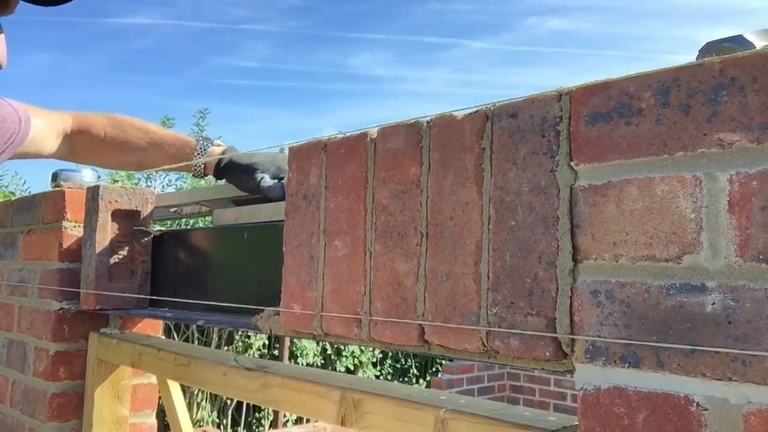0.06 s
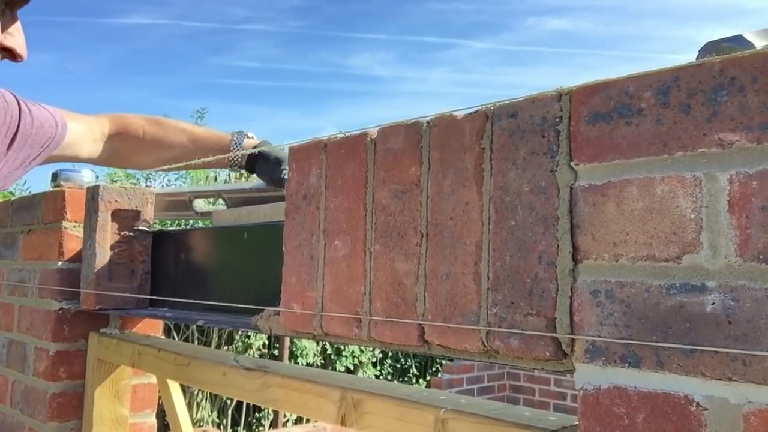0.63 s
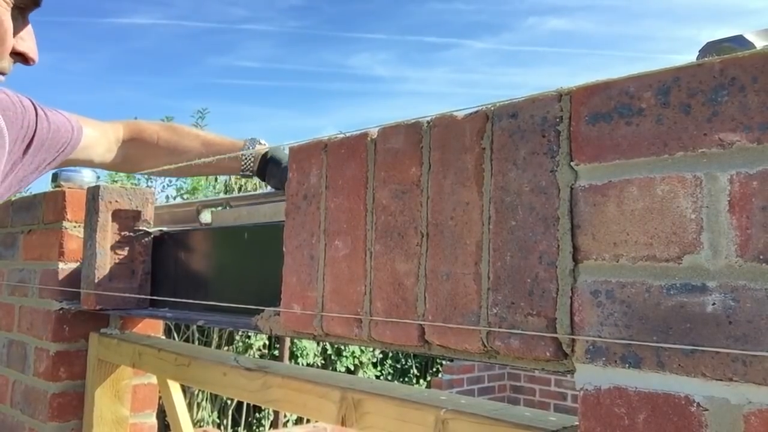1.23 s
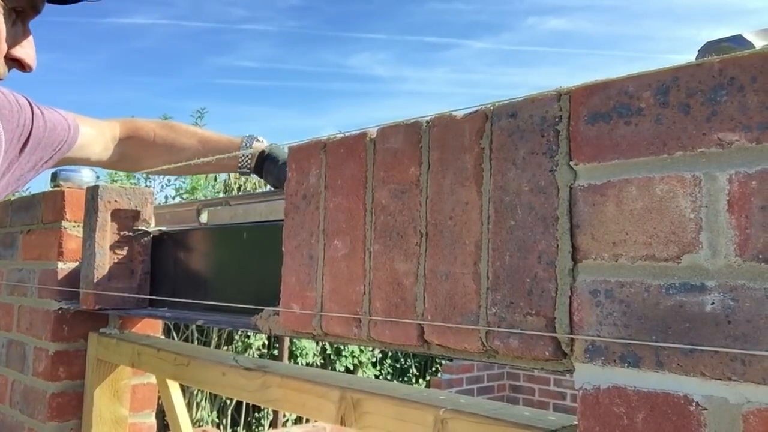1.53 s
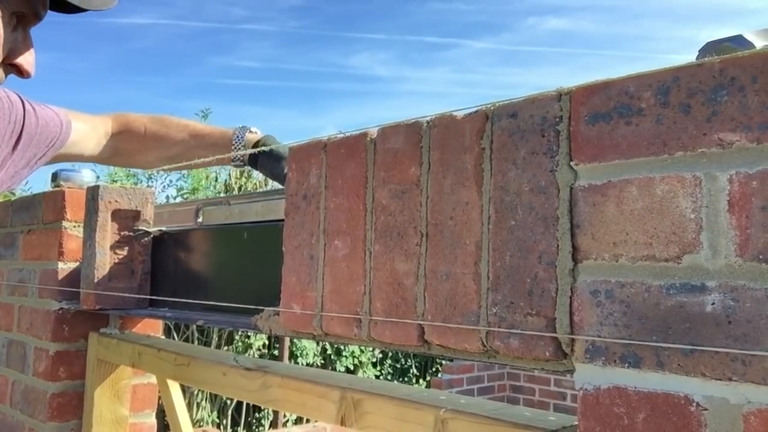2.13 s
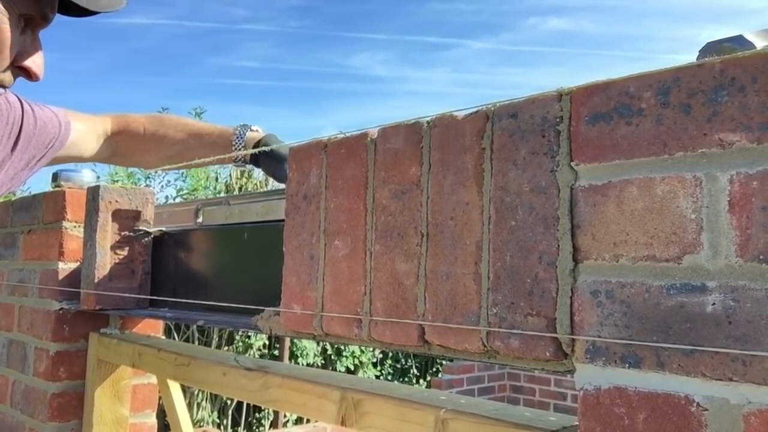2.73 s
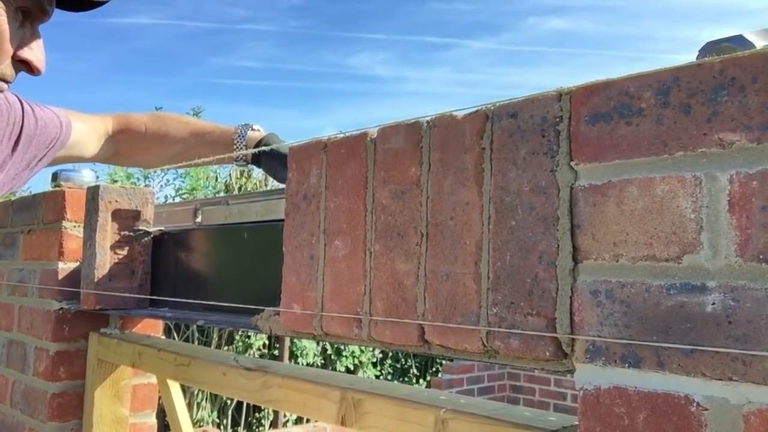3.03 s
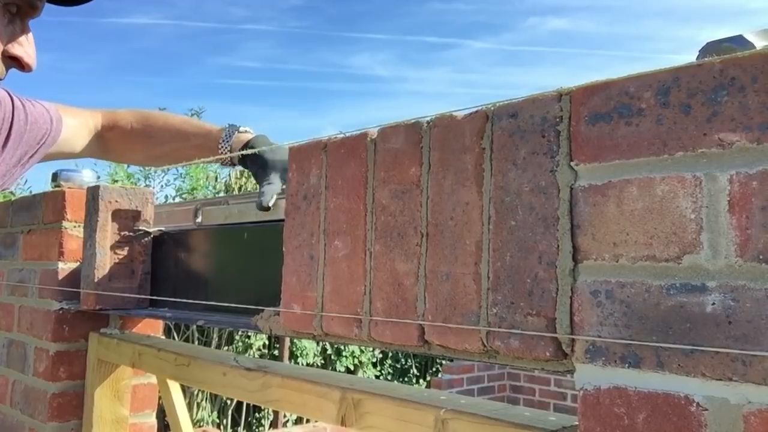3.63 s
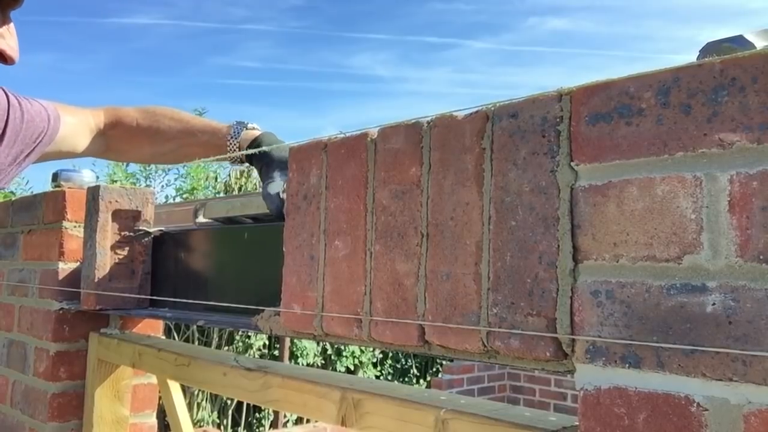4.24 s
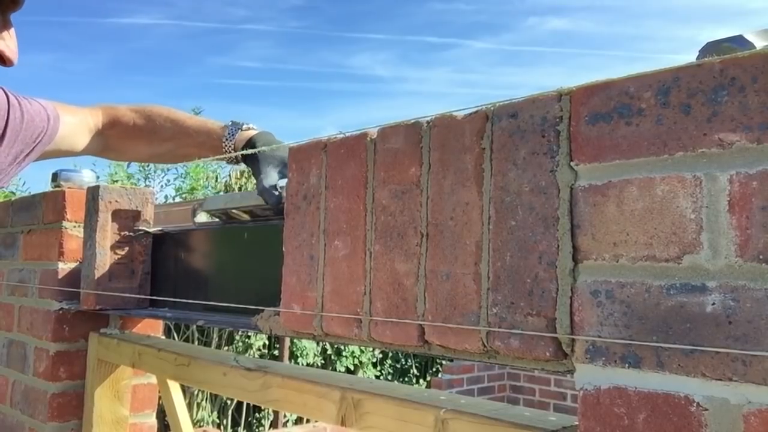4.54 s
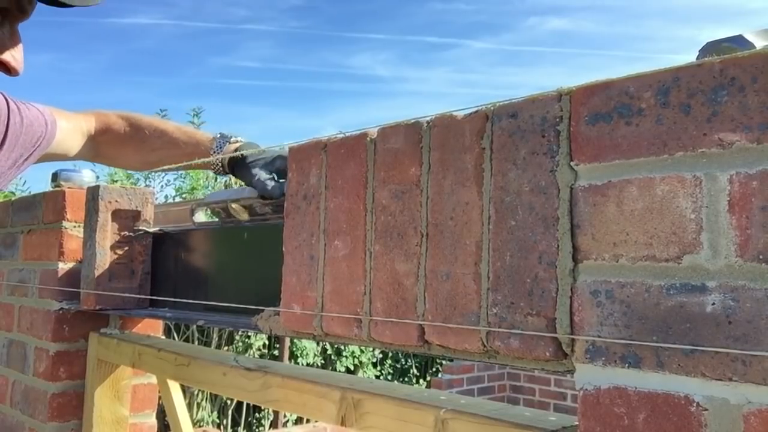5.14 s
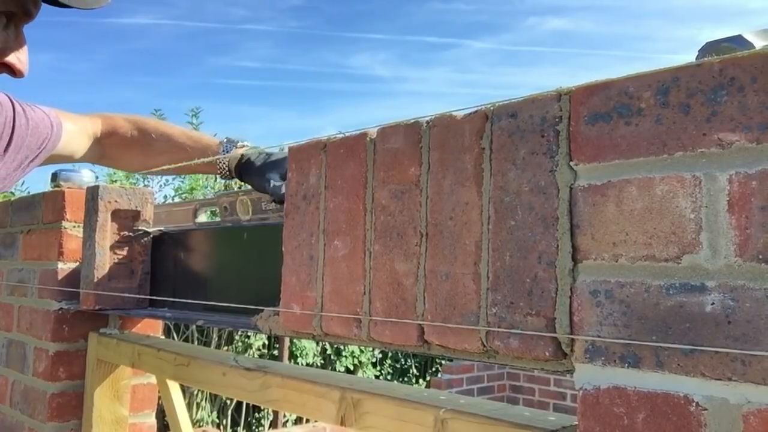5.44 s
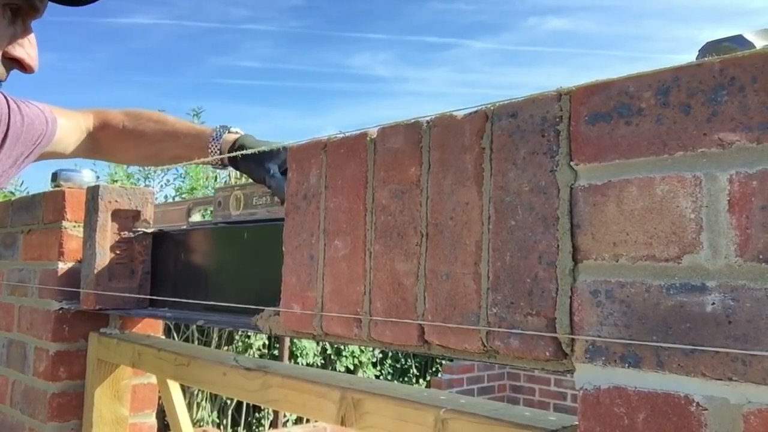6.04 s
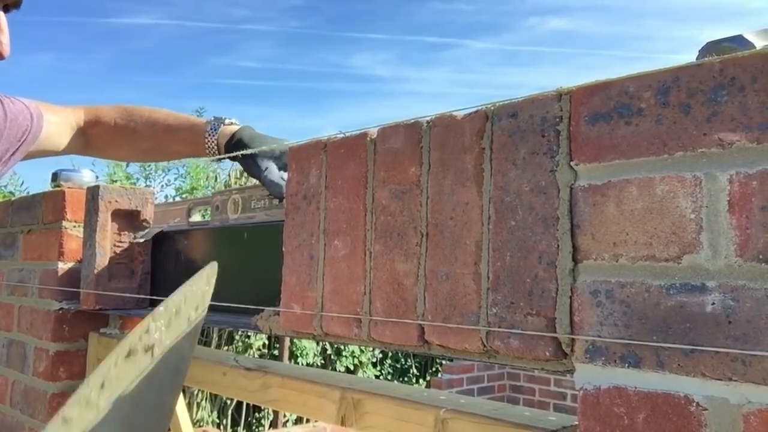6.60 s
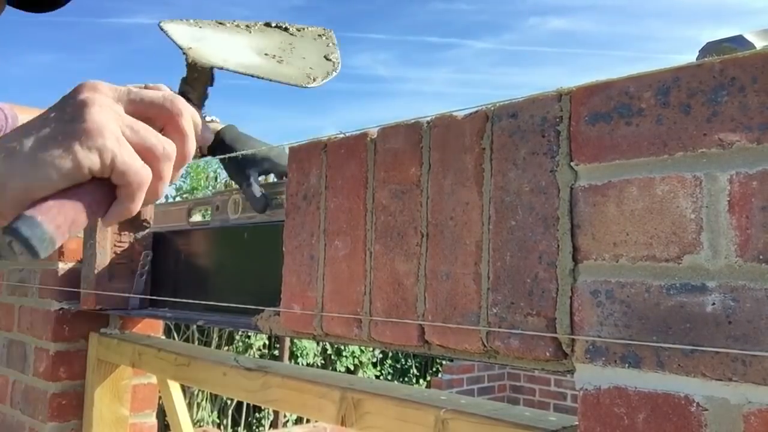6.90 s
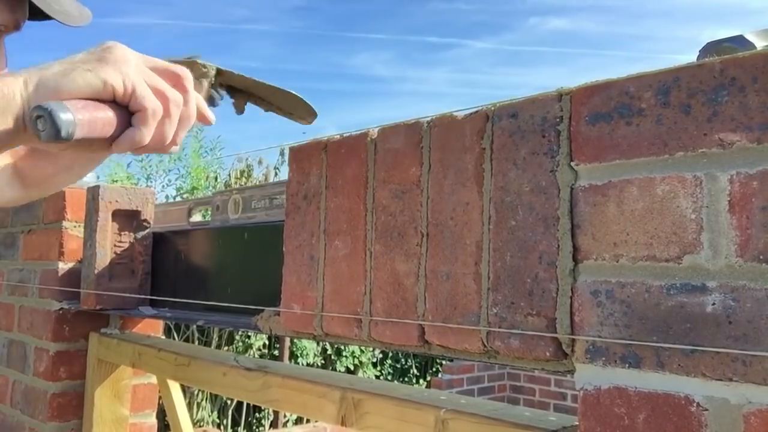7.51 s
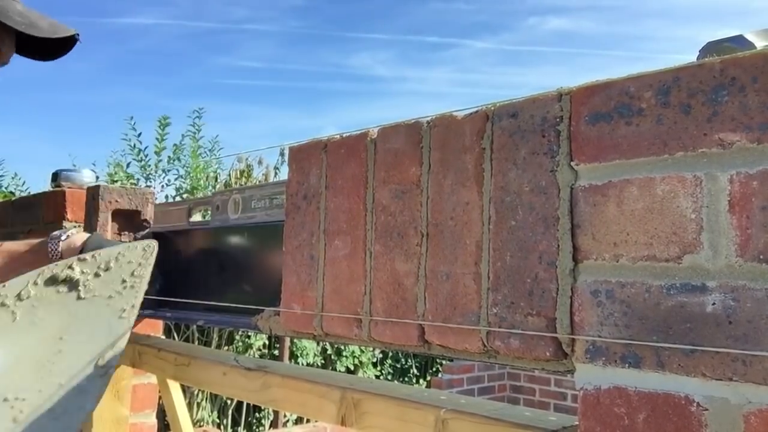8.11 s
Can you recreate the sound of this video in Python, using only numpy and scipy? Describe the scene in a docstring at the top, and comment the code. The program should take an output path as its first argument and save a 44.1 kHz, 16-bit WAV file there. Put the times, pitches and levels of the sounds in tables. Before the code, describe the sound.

A spirit level knocks, rattles and slides on bricks outdoors, then a steel trowel taps and scrapes the wall.

```python
"""Bricklaying in a quiet garden. Over a faint hush, a hollow spirit level is knocked and slid against
fresh bricks, which makes it rattle and ring; the yard answers with a dull echo. Midway, puffs of wind
touch the microphone. Then a steel trowel is lifted, ringing faintly, struck twice on the wall and
scraped along the gritty mortar joint. Last, a sleeve rustles and the level meets the bricks again."""
import sys
import numpy as np
from scipy import signal
from scipy.fft import rfft, irfft
from scipy.io import wavfile
from scipy.ndimage import uniform_filter1d

SR = 44100
rng = np.random.default_rng(int(sys.argv[2]) if len(sys.argv) > 2 else 0)


def log_audio(samples):
    """Write samples as a 16-bit WAV file to the path given in sys.argv[1]."""
    # one column per channel
    frames = np.atleast_2d(samples).T
    # limit to full scale, then quantise
    limited = np.clip(frames, -1, 1)
    pcm = np.round(limited * 32767).astype(np.int16)
    wavfile.write(sys.argv[1], SR, pcm)


N = 364266
TIME = np.arange(N) / SR
AGE = np.arange(int(.4 * SR)) / SR  # seconds since one short sound began

# Levels in the tables are relative. A fade time is how long a sound takes to drop by 60 dB.
# tone colour of the distant hush: f/Hz, level/dB
HUSH_COLOUR = [(18, -36.5), (30, -19), (59, -14.5), (237, -7), (292, -6), (332, -3.5), (359, -4),
               (420, -13), (455, -6), (492, -12.5), (691, -10), (11300, -31), (15500, -36)]
# tone colour of wind on the microphone: f/Hz, level/dB
WIND_COLOUR = [(25, -21.5), (45, 0), (70, 7), (130, -4), (200, -9), (350, -28), (700, -58.5)]
# strength of the breeze: t/s, level/dB
BREEZE = [(0, -79), (1.1, -73), (2.5, -78), (3.45, -83), (3.6, -63.5), (3.8, -77.5), (4.1, -63.5),
          (4.55, -69), (4.9, -69.5), (5.1, -63.5), (6.1, -59.5), (6.25, -75.5), (7.5, -80), (7.68, -61),
          (8.26, -72.5)]
# the strongest puffs of wind: t/s, level/dB
PUFFS = [(3.528, -40.5), (4.025, -52), (4.41, -53.5), (4.469, -45.5), (5.494, -41.5), (6.945, -58.5),
         (7.627, -56)]
# A contact has four bands, low to high: thud, clack, crack and sizzle.
# Hardness is clack minus thud; grittiness is crack minus clack.
# the level meets the bricks: t/s, clack level/dB, hardness/dB, grittiness/dB, struck spot's f/Hz
KNOCKS = [(0.0023, -64, -10.5, -15, 640), (0.1967, -65, 2, -15, 1090), (0.522, -33.5, -4.5, -12.5, 895),
          (0.666, -39, -4.5, -20, 790), (0.6891, -31.5, 3.5, -17.5, 1065),
          (0.9931, -60.5, -4.5, -6.5, 1230), (1.188, -49.5, 9, -11.5, 1420),
          (1.302, -43, -7.5, -14.5, 1020), (1.417, -48, 16, -4.5, 1400), (1.445, -46.5, 4, -1, 1400),
          (1.4827, -41.5, -3.5, -18.5, 1240), (1.745, -40.5, 28, -19.5, 1610),
          (1.8086, -50.5, -2, -11, 950), (1.9854, -37.5, -2.5, -15, 980), (2.13, -68, 5, -4, 900),
          (2.505, -67, 3.5, 2.5, 1390), (3.0941, -54.5, 3, -2, 1130), (3.79, -72.5, 9, 3.5, 3200),
          (3.901, -50.5, 10, -2.5, 1400), (4.019, -60.5, -9, 1.5, 1370), (4.2086, -68.5, 10, 4.5, 1440),
          (4.35, -73, 10, 5.5, 1410), (4.536, -65, -9.5, -7, 814), (4.5741, -52.5, -0.5, -4, 940),
          (4.6822, -55, -7, -9, 810), (5.08, -41, -1, -6.5, 1070), (5.1769, -43, 19.5, -3.5, 3530),
          (5.1934, -20.5, 9, -13, 1130), (5.2697, -43.5, -3, -11, 1000), (5.31, -39.5, -3.5, -16.5, 1070),
          (5.551, -58, -6, -17, 735), (5.652, -57, 5.5, -24.5, 1390), (5.668, -42.5, 2, -19.5, 1600),
          (5.6831, -23, 14, -9.5, 2400), (5.861, -41, 9, -25.5, 1380), (5.892, -46, 5, -20.5, 1380),
          (6.031, -42.5, 18, -5.5, 1200), (6.0668, -42, 18.5, -12.5, 1220), (6.346, -24.5, 2, -11.5, 610),
          (6.3667, -29.5, 4.5, -15, 640), (6.4021, -33, 7.5, -24, 900), (8.115, -51, 23.5, -21, 1080),
          (8.17, -42.5, 12.5, 0.5, 1150), (8.24, -41.5, 5, -1.5, 1400)]
# tone colour of a knock's rattle: f/Hz, level/dB
RATTLE_COLOUR = [(30, -59.5), (100, -15), (250, -13), (315, -1.5), (500, -5), (1000, -5.5), (1600, -6),
                 (2300, -7.5), (3200, -9), (4500, -19.5), (6500, -23), (10000, -46.5), (13000, -50),
                 (15500, -54.5)]
# ringing tones of the spirit level lying on the wall: f/Hz, level/dB, base fade time/s
LEVEL_TONES = [(315.7, -5, 0.39), (384.2, 1, 0.16), (451, -7, 0.15), (536, -17.5, 0.065), (644.2, -4, 0.26),
               (711, -8, 0.23), (870, -7, 0.33), (989, -1, 0.23), (1128, 2.5, 0.16), (1300, -20, 0.12),
               (1540, 0.5, 0.044), (1740, -9, 0.033), (2303, 3, 0.026)]
# echo of the yard: f/Hz, level/dB, fade time/s
YARD_ECHO = [(125, -6, 0.9), (340, -2, 0.33), (685, -13.5, 0.41), (1410, -14.5, 0.33), (3470, -33, 0.23),
             (12000, -35.5, 0.24)]
# the level is dragged over brick: t/s, swell/s, fade time/s, clack level/dB, hardness/dB, grittiness/dB
SLIDES = [(0.141, .08, 0.12, -71.5, -14.5, -6), (.70, .04, 0.85, -56, -2.5, -17.5),
          (1.10, 0.14, 0.15, -54, -5, -10), (1.33, .11, .3, -52.5, -5, -8.5),
          (1.679, .05, 0.074, -55, -0.5, -9), (1.901, .08, 0.18, -47, 1, -9.5),
          (2.001, .03, 0.31, -68, -16, -25), (2.2, 0.049, 0.39, -76.5, -17.5, -20),
          (3.868, .13, .2, -66, 4, -4.5), (5.12, .09, 0.16, -58, -12.5, -6),
          (5.31, .03, 1, -71.5, -9, -10.5), (5.711, .03, 0.2, -63, -11.5, -8.5),
          (5.89, .13, 0.48, -51.5, 7.5, -6), (6.29, 0.039, .7, -59.5, 5, -14.5),
          (6.62, .14, 0.8, -64.5, 5, -8), (8.169, .045, 0.12, -40, 18.5, -5)]
# tone colour of that rubbing: f/Hz, level/dB
RUB_COLOUR = [(30, -37), (100, -13), (330, -1.5), (1100, 0), (2300, -13), (4000, -8), (6500, -21.5),
              (10000, -40.5), (15500, -54)]
# the blade rings, swelling as it swings near: t/s, level/dB, swell/s, favoured f/Hz, tilt/(dB per octave)
BLADE_RINGS = [(6.49, -80, .1, 10700, 6), (6.6, -52, .16, 2370, -6), (6.822, -49, .01, 6900, 0),
               (6.941, -34, .002, 4450, -5), (6.98, -43, .045, 7230, -2), (7.157, -34, .002, 10900, 3),
               (7.246, -33, .014, 6550, -1)]
# pitches of the free steel blade: f/Hz
BLADE_HZ = [2373, 3160, 4452, 5015, 6553, 7230, 8760, 10696, 11052, 12550]
# strength and fading of those pitches, in the same order: level/dB, fade time/s
BLADE_TONES = [(1, 0.63), (-2.5, 0.18), (-2, 0.51), (-3.5, 0.53), (-1.5, 1), (3.5, 0.34), (-4, 0.34),
               (-8, 0.54), (-3.5, 0.5), (-5.5, 0.37)]
# the trowel meets the wall: t/s, clack level/dB, hardness/dB, grittiness/dB, contact/s, struck spot's f/Hz
TROWEL_HITS = [(6.815, -56.5, -1.5, 5.5, 0.02, 2960), (6.9372, -16, 17.5, -6.5, 0.0035, 1155),
               (6.986, -31.5, 13, -10.5, 0.0012, 1290), (7.1564, -26.5, 5.5, 1.5, 0.0016, 5400),
               (7.2298, -34, 15, -0.5, 0.013, 1190), (7.248, -30.5, 10, 1, .011, 1210),
               (7.2964, -35, 12.5, -1, 0.0026, 1200), (7.3788, -42, -2.5, 2, 0.0064, 680),
               (7.397, -62, -12, -3, 0.0021, 694), (7.4242, -42, 9, 2.5, 0.0024, 1805),
               (7.4488, -39, 14, 6.5, 0.011, 2090), (7.464, -32, 11.5, -9, 0.016, 2120),
               (7.506, -39, 11, 3.5, 0.0051, 1510), (7.513, -44, 10, -13, 0.0036, 2290)]
# tone colour of steel crushing grit: f/Hz, level/dB
CRUNCH_COLOUR = [(30, -45.5), (100, -36), (250, -13), (700, -5), (1100, -10.5), (2500, -4.5), (6500, -6),
                 (8000, -9), (13000, -15), (15500, -19.5)]
# resonances of the blade held against the wall: f/Hz, width/Hz, level/dB
HELD_BLADE = [(717, 6.3, 8.5), (995, 130, 4.5), (1190, 210, 7), (1456, 40, 5.5), (1660, 130, 5),
              (1750, 35, -6), (2370, 100, -3), (2670, 64, 8), (3290, 30, -3), (3840, 380, -1),
              (5580, 450, -1)]
# the sleeve as the arm draws back: t/s, level/dB
SLEEVE_MOVE = [(7.70, -99), (7.765, -58.5), (7.9, -58), (7.985, -57), (8.04, -63.5), (8.16, -64),
               (8.26, -47)]
# tone colour of rubbing cloth: f/Hz, level/dB
CLOTH_COLOUR = [(240, -32.5), (400, -4), (670, -9.5), (1070, 0.5), (1290, -9), (1570, 2.5), (1880, -7.5),
                (2580, -1), (4810, -20), (5680, -14.5), (15000, -36.5)]

BLOW_S = .02  # a blow's loudness is set over this opening stretch
# sizzle minus crack: dB at zero grittiness, extra dB per dB of grittiness
LEVEL_SIZZLE, TROWEL_SIZZLE = (-10.5, 0.8), (-7.5, 0.9)


def undb(db):
    """Turn decibels into a number to multiply by."""
    return 10 ** (np.asarray(db) / 20)


def unit(x, seconds=None):
    """Scale to an average strength (rms) of 1, over the first seconds or the whole sound."""
    head = x if seconds is None else x[:int(seconds * SR)]
    return x / np.sqrt(np.mean(head ** 2) + 1e-24)


def add(out, start, x):
    """Mix a sound in at a start time."""
    i = max(int(start * SR), 0)
    out[i:i + len(x)] += x[:max(N - i, 0)]


def colour(x, points, size=2048):
    """Filter a sound along a curve of (f/Hz, level/dB) points."""
    hz, db = np.transpose(points)
    freqs = np.maximum(np.fft.rfftfreq(size, 1 / SR), 1)
    gains = undb(np.interp(np.log(freqs), np.log(hz), db))
    # build the filter so that nothing comes out before the sound goes in
    cepstrum = irfft(np.log(gains))
    cepstrum[1:size // 2] *= 2
    cepstrum[size // 2 + 1:] = 0
    return signal.fftconvolve(x, irfft(np.exp(rfft(cepstrum))))[:len(x)]


def band(x, lo_hz, hi_hz):
    """Keep what lies between two frequencies."""
    return signal.sosfilt(signal.butter(3, [lo_hz, hi_hz], "band", fs=SR, output="sos"), x)


def fade(t, fade_s):
    """Stay at 1 until t = 0, then drop by 60 dB every fade_s seconds."""
    return np.exp(-np.log(1000) * np.maximum(t, 0) / fade_s)


def wander(count, rate):
    """Drift to a new random value, rate times a second."""
    steps = rng.standard_normal(200)
    return np.interp(np.arange(count) * rate / SR, np.arange(len(steps)), steps)


def ring(tones):
    """A struck object rings as a sum of fading sine waves."""
    return sum(undb(db) * fade(AGE, fade_s) * np.sin(2 * np.pi * (hz * AGE + rng.random()))
               for hz, db, fade_s in tones)


def resonance(x, hz, q):
    """Pick out the sound around one pitch; a higher q is narrower."""
    return signal.lfilter(*signal.iirpeak(hz, q, fs=SR), x)


def grit(count, rate, spread_db):
    """Tiny, dense clicks whose strength jumps from one grain to the next."""
    grain = (np.arange(count) * rate / SR).astype(int)
    clicks, sizes = rng.standard_normal((2, count))
    return unit(clicks * undb(spread_db * np.minimum(sizes, 2)[grain]))


def bounce(x, shortest_s, spread_s, share):
    """Nearby brick faces send back three copies within milliseconds, colouring the sound."""
    out = x.copy()
    for chance in rng.random(3):
        lag = int((shortest_s + spread_s * chance) * SR)
        out[lag:] += share * x[:-lag]
    return out


def band_levels(db, hardness_db, grit_db, sizzle):
    """Levels of thud, clack, crack and sizzle: hardness thins the thud, grit adds treble."""
    crack_db = db + grit_db
    return [db - hardness_db, db, crack_db, crack_db + sizzle[0] + sizzle[1] * grit_db]


def set_bands(x, levels_db, seconds):
    """Bring thud, clack, crack and sizzle to the given levels over the first seconds."""
    edges_hz, size = np.array([200, 700, 2500, 7500, 16000]), 16384
    head = x[:int(seconds * SR)]
    spectrum = rfft(head * signal.windows.tukey(len(head), .1), size)
    power = 2 * np.abs(spectrum) ** 2 / (size * len(head))
    band_power = np.add.reduceat(power, edges_hz * size // SR)[:-1]
    gain_db = np.array(levels_db) - 10 * np.log10(band_power)
    corners_hz = np.column_stack([edges_hz[:-1] * 1.2, edges_hz[1:] / 1.2]).ravel()
    return colour(x, np.column_stack([corners_hz, np.repeat(gain_db, 2)]))


def garden_hush(level_db=-72.5, swell_db=0.39):
    """A faint, distant hush swells slowly."""
    swell = np.interp(TIME, np.linspace(0, TIME[-1], 25), rng.standard_normal(25))
    return unit(colour(rng.standard_normal(N), HUSH_COLOUR)) * undb(level_db + swell_db * swell)


def wind(puff_half_s=0.0091, gust_db=5):
    """Soft swirls of air buffet the microphone: a gusty breeze and a few stronger puffs."""
    swirls = unit(colour(rng.standard_normal(N), WIND_COLOUR))
    swirls /= np.sqrt(uniform_filter1d(swirls ** 2, size=1500))  # even out the loudness
    puffs = sum(undb(db) * np.exp(-.5 * ((TIME - t) / puff_half_s) ** 2) for t, db in PUFFS)
    breeze = undb(np.interp(TIME, *np.transpose(BREEZE)) + gust_db * wander(N, rate=16))
    return swirls * (puffs + breeze)


def level_landings(firm_db=-23.5, firm_contact_s=.0026, rock_s=.02):
    """One end of the level lands, then the other follows, weaker and less gritty."""
    for t, db, hardness_db, grit_db, spot_hz in KNOCKS:
        # weak or gritty knocks press for longer
        contact_s = firm_contact_s * 2 ** (.048 * (firm_db - db) + .05 * grit_db)
        # hard knocks rattle briefly and hardly rock
        rattle_s = 0.11 / 2 ** (0.069 * hardness_db)
        rock_db = db - 10 - .4 * hardness_db
        first_end = band_levels(db, hardness_db, grit_db, LEVEL_SIZZLE)
        other_end = band_levels(rock_db, hardness_db, grit_db - 10, LEVEL_SIZZLE)
        yield t, first_end, contact_s, rattle_s, spot_hz
        yield t + rock_s, other_end, contact_s, rattle_s, spot_hz


def level_knocks():
    """Each knock crushes a little grit, rattles on the rough brick and rings the hollow level."""
    out = np.zeros(N)
    for t, levels_db, contact_s, rattle_s, spot_hz in level_landings():
        press = np.minimum(AGE / (.5 * contact_s), 1)
        grains = grit(len(AGE), rate=430, spread_db=2) * press
        crush_shape = fade(AGE - contact_s, 0.044) + 0.36 * fade(AGE, 1.7 * rattle_s)
        crush = colour(grains * crush_shape, RATTLE_COLOUR)
        rattle = colour(band(grains, 71, 2500) * fade(AGE, rattle_s), RATTLE_COLOUR)
        # every spot favours other tones and shifts their pitch a little
        shifts = 1 + .03 * rng.standard_normal(len(LEVEL_TONES))
        boosts_db = 3 * rng.standard_normal(len(LEVEL_TONES))
        tones = [(hz * shift, db + boost, fade_s * (rattle_s / 0.1) ** .5)
                 for (hz, db, fade_s), shift, boost in zip(LEVEL_TONES, shifts, boosts_db)]
        ringing = press * ring(tones)
        hit = unit(rattle, BLOW_S) + undb(0.5) * unit(ringing, BLOW_S) + undb(1) * unit(crush, BLOW_S)
        hit += 1.2 * resonance(hit, spot_hz, q=2.6)
        hit = bounce(hit, shortest_s=.0008, spread_s=.004, share=0.27)
        add(out, t - contact_s / 4, set_bands(hit, levels_db, BLOW_S))
    return out


def yard_echo(x):
    """Walls and fences scatter the sound back; the low notes stay longest."""
    age = TIME[:SR]
    hz, db, fade_s = np.transpose(YARD_ECHO)
    echo = 0
    for centre_hz in np.geomspace(125, 11314, num=14):
        gain = undb(np.interp(np.log(centre_hz), np.log(hz), db))
        tail_s = np.interp(np.log(centre_hz), np.log(hz), fade_s)
        shape = fade(age, tail_s) * (1 - fade(age, 0.028))
        noise = band(rng.standard_normal(SR), centre_hz / 2 ** .25, centre_hz * 2 ** .25)
        echo += gain * noise * shape / np.linalg.norm(shape)
    return signal.fftconvolve(x, echo)[:N]


def level_slides(grip_s=0.036, swell_db=12.5):
    """Sand catches under the sliding level and makes it ring; each push grips, swells and eases off."""
    out, age = np.zeros(N), TIME[:SR]
    for t, swell_s, fade_s, db, hardness_db, grit_db in SLIDES:
        grip = np.minimum(age / grip_s, 1)
        push = undb(swell_db * np.minimum(age / swell_s, 1)) * fade(age - swell_s, fade_s)
        rub = grit(len(age), rate=200, spread_db=3) * grip * push
        ringing = signal.fftconvolve(rub, ring(LEVEL_TONES))[:len(age)]
        slide = unit(colour(rub, RUB_COLOUR)) + undb(-3) * unit(ringing)
        slide = bounce(slide, shortest_s=.0004, spread_s=.0024, share=0.5)
        add(out, t, set_bands(slide, band_levels(db, hardness_db, grit_db, LEVEL_SIZZLE), swell_s))
    return out * undb(-2.5)


def blade_rings(pressed_at_s=7.33):
    """The free blade sings until it is pressed into the mortar; each tone wavers as the blade turns."""
    out = np.zeros(N)
    hz = np.array(BLADE_HZ)[:, None]
    tone_db, fade_s = np.transpose(BLADE_TONES)[:, :, None]
    for t, db, swell_s, favoured_hz, tilt_db in BLADE_RINGS:
        octaves = np.log2(hz / favoured_hz)
        favour_db = 9.8 * np.exp(-(octaves / 0.097) ** 2)
        gains = undb(tone_db + tilt_db * octaves + favour_db)
        waver = undb([4 * wander(len(AGE), rate=24) + 1.8 * wander(len(AGE), rate=130) - 2 for _ in hz])
        sines = np.sin(2 * np.pi * (hz * AGE + rng.random(hz.shape)))
        tones = gains * waver * fade(AGE - swell_s, fade_s) * sines
        swell = np.minimum(AGE / swell_s, 1) ** 2
        add(out, t, undb(db) * swell * tones.sum(axis=0) / np.linalg.norm(gains))
    return out * fade(TIME - pressed_at_s, 0.19)


def trowel_hits():
    """The steel edge crushes grit while it touches the wall: briefly for a tap, longer for a scrape."""
    out = np.zeros(N)
    for t, db, hardness_db, grit_db, contact_s, spot_hz in TROWEL_HITS:
        press = np.minimum(AGE / (.5 * contact_s), 1)
        release = fade(AGE - contact_s, 0.035) + 0.57 * fade(AGE - contact_s, 0.13)
        crunch = colour(grit(len(AGE), rate=500, spread_db=2.5) * press * release, CRUNCH_COLOUR)
        crunch += sum(undb(boost) * resonance(crunch, hz, q=hz / width) for hz, width, boost in HELD_BLADE)
        crunch += 3.9 * resonance(crunch, spot_hz, q=4.4)
        crunch = bounce(crunch, shortest_s=.0004, spread_s=.002, share=.4)
        add(out, t, set_bands(crunch, band_levels(db, hardness_db, grit_db, TROWEL_SIZZLE), BLOW_S))
    return out * undb(-1.65)


def sleeve_rustle():
    """Cloth rubs in many tiny catches as the arm draws back."""
    rustle = unit(colour(grit(N, rate=71, spread_db=2.5), CLOTH_COLOUR))
    return rustle * undb(np.interp(TIME, *np.transpose(SLEEVE_MOVE)))


def scene():
    """Mix everything into one channel; only the tools' contacts with the wall get an echo."""
    level, trowel = level_knocks() + level_slides(), trowel_hits()
    tools = level + trowel + blade_rings() + yard_echo(level + undb(3) * trowel)
    return (tools + sleeve_rustle() + wind() + garden_hush())[None]


def record(dry, top_hz=15750):
    """A steep filter cuts off the highest treble."""
    return signal.sosfilt(signal.ellip(10, .2, 70, top_hz, fs=SR, output="sos"), dry)


dry = scene()
out = record(dry)
log_audio(out)
```